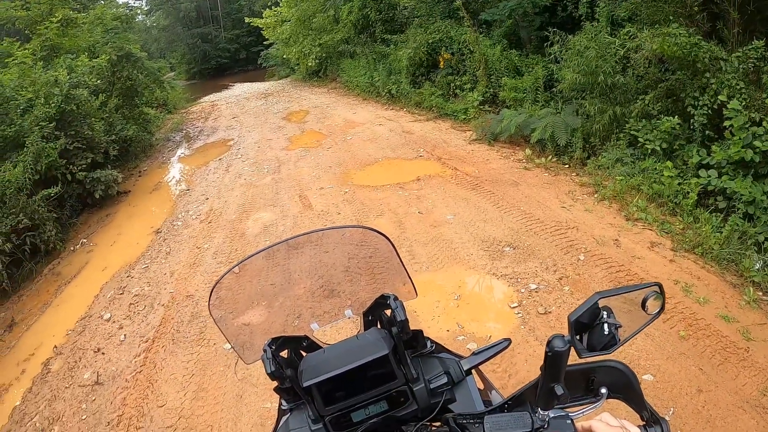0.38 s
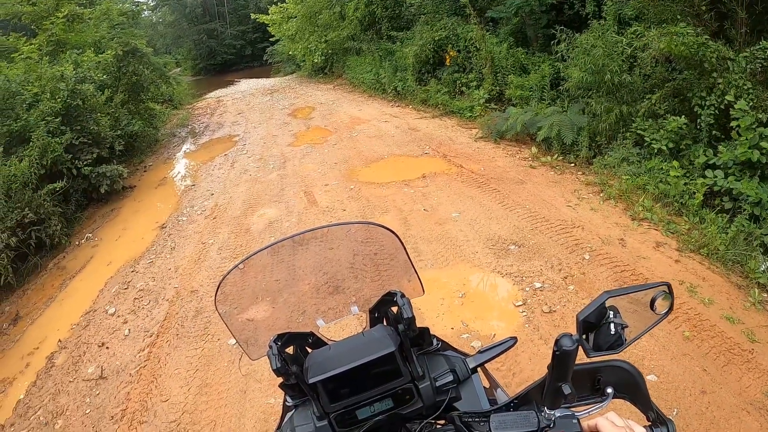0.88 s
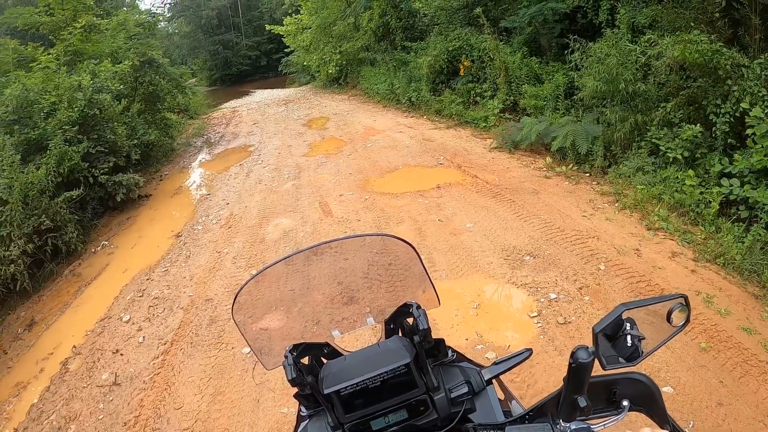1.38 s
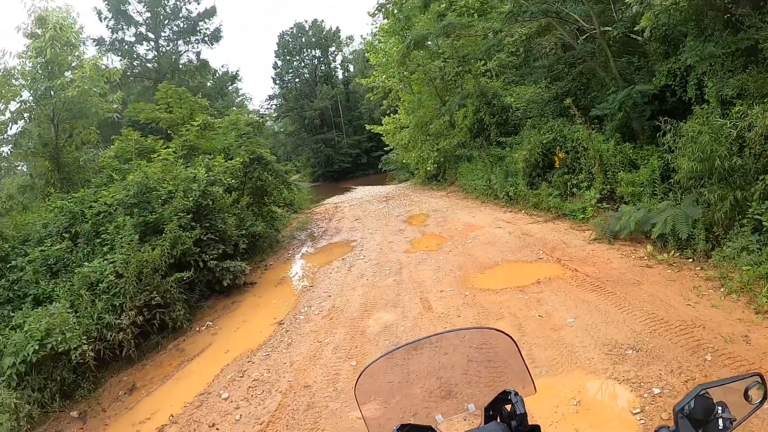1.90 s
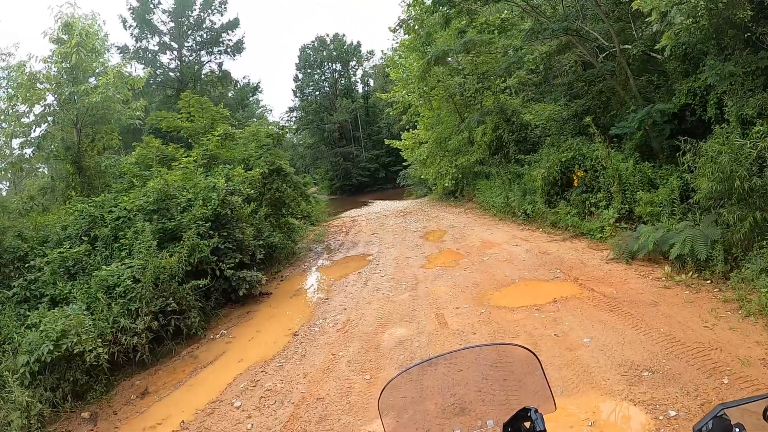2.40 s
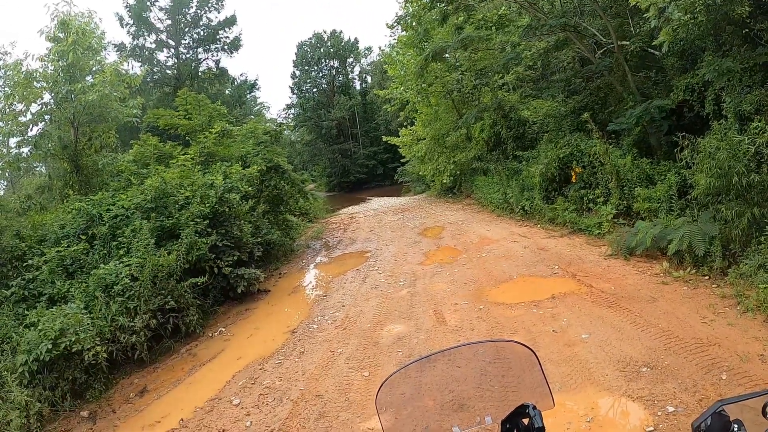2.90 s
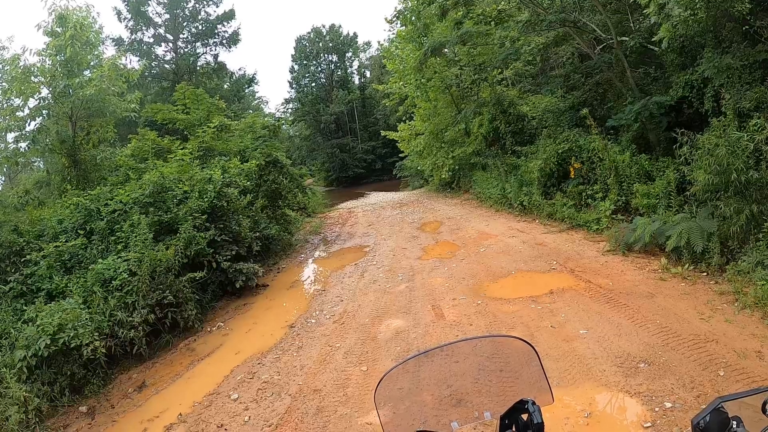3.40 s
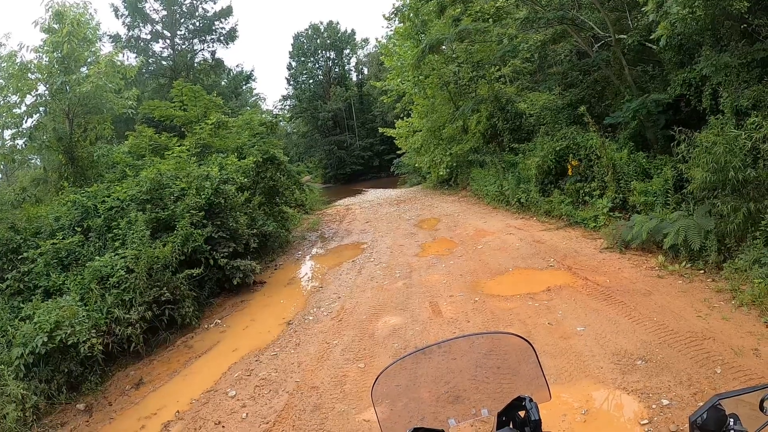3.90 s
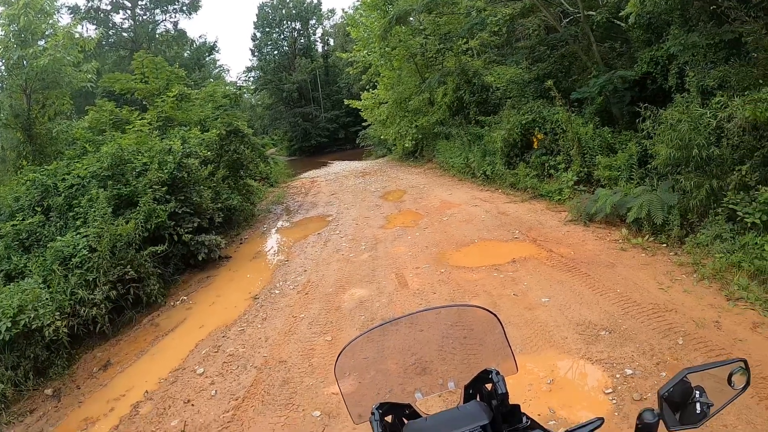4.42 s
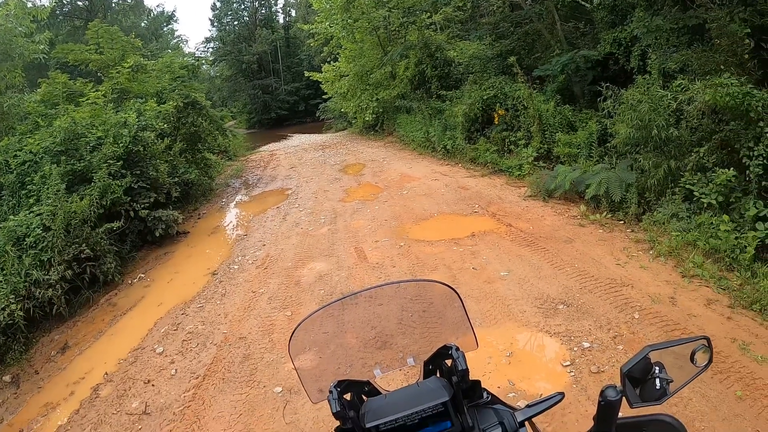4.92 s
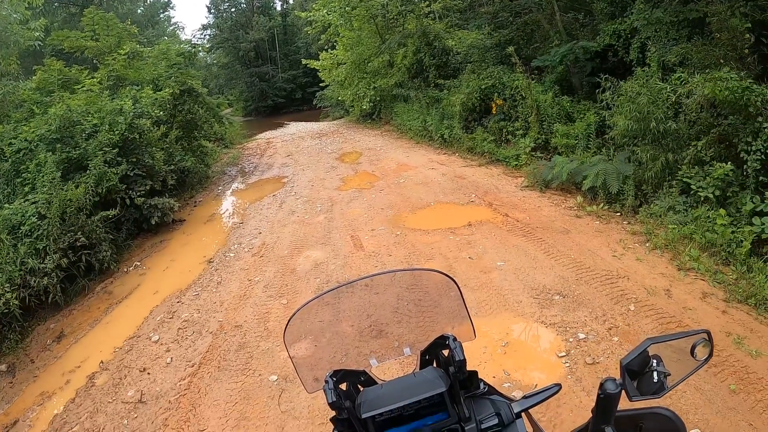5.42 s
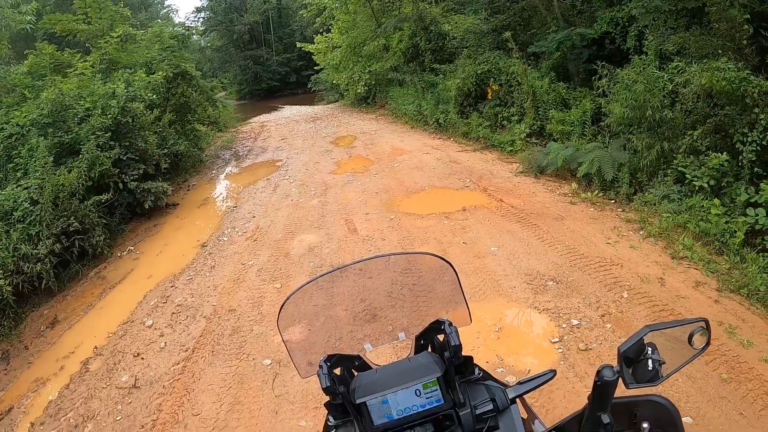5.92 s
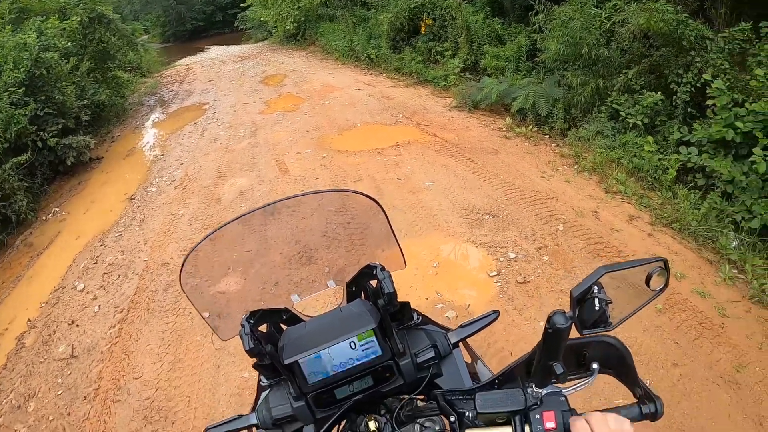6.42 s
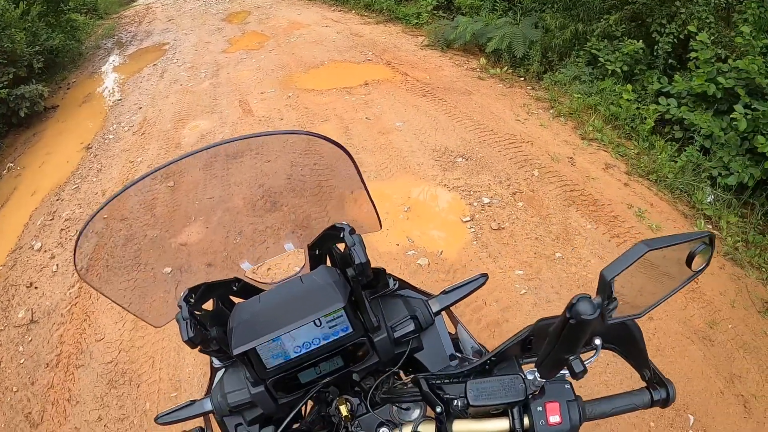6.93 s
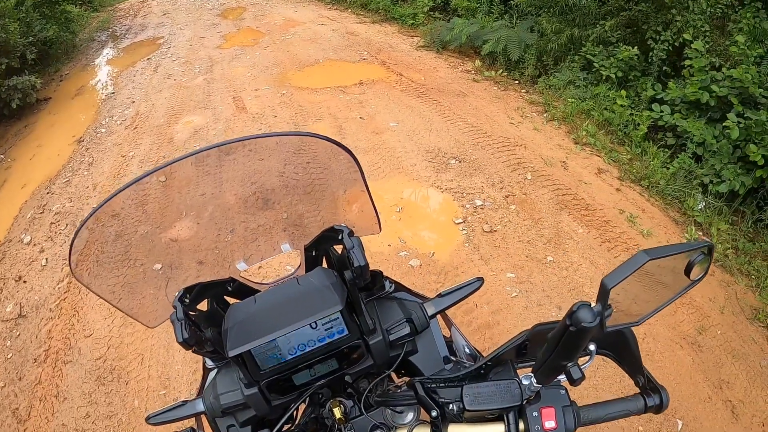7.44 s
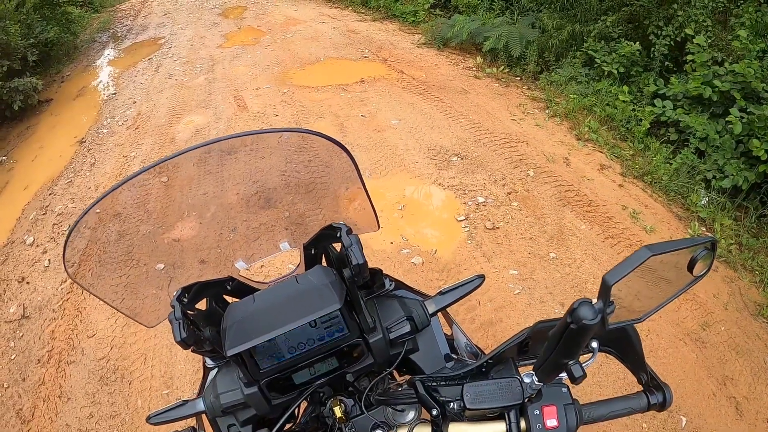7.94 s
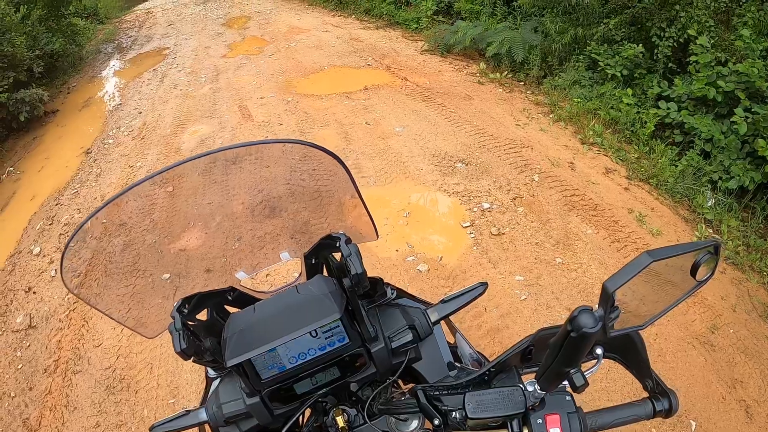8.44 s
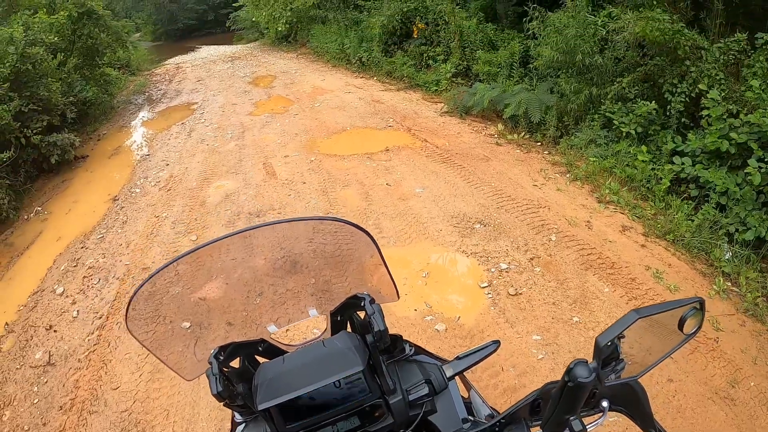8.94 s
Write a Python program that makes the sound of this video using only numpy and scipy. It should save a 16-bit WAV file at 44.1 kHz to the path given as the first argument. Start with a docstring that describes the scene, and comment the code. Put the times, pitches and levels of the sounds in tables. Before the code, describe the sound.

Just-caught motorcycle engine flares briefly and drops to a steady lumpy idle, heard close from the rider's head, with faint bird whistles and small plastic ticks.

```python
"""Hard barks and a bright starter rush: a twin-cylinder motorcycle engine has just caught under a rider's
helmet microphone. It flares, then settles from a fast idle to a slow one, throbbing with uneven firing.
Gas pulses locked to the crank ring pipe and silencer; blows and chatter ring the cases; shaped noise makes
the chain, gear and air rustle. Far birds are gliding sines, close plastic ticks are ringing noise bursts."""
import sys
import numpy as np
from scipy import signal
from scipy.fft import rfft, irfft, next_fast_len
from scipy.io import wavfile
from scipy.ndimage import uniform_filter1d

SR = 44100
rng = np.random.default_rng(int(sys.argv[2]) if len(sys.argv) > 2 else 0)


def dump_mix(stems):
    """Bounce the given channels to the path in sys.argv[1] as a 16-bit WAV at rate SR."""
    frames = np.atleast_2d(stems).T  # one column per channel
    limited = np.clip(frames, -1, 1)  # hard clip at full scale
    pcm = np.round(limited * 32767).astype(np.int16)
    wavfile.write(sys.argv[1], SR, pcm)


def nominal_scale(level):
    """Amplitude ratio for a level in decibels (scalar or array-like)."""
    x = np.asarray(level, float) / 20
    return 10 ** x


N = 399987

# crank speed: time_s, speed_rpm
CRANK_RPM = [(0, 1886.4), (.3, 1525.6), (1, 1636.4), (1.28, 1614.2), (1.56, 1641.6), (1.98, 1573.4),
             (2.54, 1423.4), (3.66, 1461.7), (3.94, 1406.9), (4.36, 1401), (4.5, 1438.5), (4.78, 1378.2),
             (5.48, 1354.9), (5.62, 1404.3), (6.18, 1320.2), (6.32, 1384.2), (7.3, 1312.4), (7.72, 1373.3),
             (8.7, 1336.9), (9.07, 1371.8)]
# throttle over the first uneven firings: time_s, throttle_db
THROTTLE = [(0, 4), (.05, 0), (.1, 6.5), (.15, -4), (.2, -0.5), (.3, 1), (.5, 0.28)]
# head bowed towards the engine: time_s, bow_0_to_1
HEAD_BOW = [(0, .6), (1.5, .6), (2, 0), (4.3, 0), (4.7, .3), (6.3, .4), (6.7, 1), (8.5, 1), (9.07, .6)]
# modes of the cases: mode_hz
CASE_MODES_HZ = [195, 249, 290, 337, 400, 480, 600, 790, 1090, 1220, 1640, 2050, 2300, 3150, 3940, 4250,
                 5060, 6000, 8900]
# per mode: width_hz (one pass), level_db, fast_idle_extra_db, bowed_extra_db
CASE_MODES = [(53.4, -33, 2.5, -4), (49.4, -40, 0, 1.9), (54, -44, -4, -2.5), (52.3, -46.5, -2.5, 1.5),
              (75.4, -45.5, -1.6, 5), (66, -47, 3, 1.7), (80, -54.5, 10, -7), (90, -60, -2.5, 6.5),
              (138.89, -59, -1.5, 13.5), (130, -59, 3.5, 16), (120, -54.5, 10, 0), (102, -55.5, -11, 8),
              (164, -71, 12.5, 1.5), (95, -63, -0.5, -14.5), (83, -68.5, 4.5, -1.5), (61, -65, -2.5, 1.5),
              (86, -72.5, -0.5, -7.5), (240, -73, -2, 3), (500, -77.5, 1.3, -2.5)]


def evened(x):
    """Scales to rms 1."""
    return x / np.sqrt(np.mean(x ** 2) + 1e-20)


def read_log(points, hz):
    """Reads a spectrum on a log frequency axis."""
    f_hz, value = np.transpose(points)
    return np.interp(np.log(hz + 1), np.log(f_hz + 1), value)


def at_times(curve, t_s):
    """Reads a (time, value) curve at times t_s."""
    curve = np.array(curve)
    return np.interp(t_s, curve[:, 0], curve[:, 1])


SIZE = next_fast_len(N + SR // 2)
TIME_S = np.arange(N) / SR
SPEED_RPM = at_times(CRANK_RPM, TIME_S)
START_CYCLE = .098  # share of the four-stroke cycle done at the first instant
CYCLE = START_CYCLE + np.cumsum(SPEED_RPM) / 120 / SR  # one cycle takes two turns
FAST = (SPEED_RPM - 1440) / 180  # 0 at a middling idle, 1 at the fast idle


def since(place, cycle):
    """Share of a cycle since the crank passed a place, and the number of that pass."""
    turns = cycle - place + 20
    return turns % 1, turns.astype(int)


def band(hz, width_hz):
    """Response of one resonance over the FFT bins, gain 1 at its centre."""
    s = 1j * np.fft.rfftfreq(SIZE, 1 / SR)
    return width_hz * s / (hz ** 2 + width_hz * s + s ** 2)


def port(hz):
    """Half the balance and phase step between the two microphone ports."""
    # left-right balance: frequency_hz, balance_db
    tilt = [(60, 1.5), (120, 1.5), (240, 1), (470, -1), (930, -2), (1850, 0.5), (3680, 0.5), (7300, -1),
            (14500, -10.5)]
    # phase by which the left port leads: frequency_hz, lead_rad
    lead = [(30, -.015), (300, -.09), (1000, -0.17), (3010, -0.29), (6120, -1.2), (7240, -3.1),
            (8610, -2.17), (11600, 0.73), (13700, .1)]
    return nominal_scale(read_log(tilt, hz) / 2) * np.exp(.5j * read_log(lead, hz))


def ports(x):
    """Spreads one sound over the two ports with their lag and balance."""
    half = port(np.fft.rfftfreq(SIZE, 1 / SR))
    return irfft(rfft(x, SIZE) * np.array([half, 1 / half]), SIZE)[:, :N]


def noise(field_db):
    """Partly alike two-port noise of rms 1, shaped by a bins x frames field of dB."""
    # left-right likeness: frequency_hz, likeness_0_to_1
    likeness = [(60, 0.96), (130, 0.61), (290, 1), (630, 1), (1380, 0.95), (3020, 0.67), (6620, 0.15),
                (14500, 0.03)]
    lowest_hz = 300
    hz = np.fft.rfftfreq(512, 1 / SR)
    a, b, c, d = rng.standard_normal((field_db.shape[1], 257, 4)).T
    same = np.clip(read_log(likeness, hz), 0, 1)[:, None]
    left = a + 1j * b
    right = same * left + np.sqrt(1 - same ** 2) * (c + 1j * d)
    half = port(hz)[:, None]
    spectra = np.array([left * half, right / half]) * nominal_scale(field_db) * (hz[:, None] > lowest_hz)
    return evened(signal.istft(spectra, nperseg=512, noverlap=384)[1][:, :N])


def exhaust():
    """Gas pulses locked to the crank ring the pipe and the silencer chambers."""
    # firing order: place_cycles, level_db
    cylinders = [(0, 0), (.3636, -2.3)]
    # gas pulses around each firing: place_cycles, length_cycles, signed_area
    strokes = [(-.0184, .0109, .109), (.2702, .0671, -.587), (.3872, .0545, -.223)]
    # silencer chambers: centre_hz, width_hz, signed_gain
    silencer = [(58.8, 21.2, .202), (80.5, 10.9, -.217), (91.3, 16.7, -.125), (177, 16.8, .089)]
    pipe_hz, pipe_width_hz = 36.9, 13
    scatter_db = 0.45
    throttle_bites = (1.6, .5, .5)  # dB per throttle dB; the sharp blowdown gains most
    # the pipe already rings: past firings wrap round the FFT
    earlier_s = -np.arange(SIZE - N, 0, -1) / SR
    cycle = np.r_[CYCLE, START_CYCLE + earlier_s * CRANK_RPM[0][1] / 120]
    throttle_db = at_times(THROTTLE, np.r_[TIME_S, earlier_s])
    gas = np.zeros(SIZE)
    for fire, db in cylinders:
        strength = nominal_scale(db + scatter_db * rng.standard_normal(200))
        for (place, length, area), bite in zip(strokes, throttle_bites):
            u, k = since(fire + place, cycle)
            pulse = u / length ** 2 * np.exp(-u / length)
            gas += area * strength[k] * nominal_scale(bite * throttle_db) * pulse
    gas[:N] *= nominal_scale(0.2 * FAST)  # more gas at speed
    s = 1j * np.fft.rfftfreq(SIZE, 1 / SR)
    chambers = sum(gain * band(hz, width_hz) for hz, width_hz, gain in silencer)
    pipe = band(pipe_hz, pipe_width_hz) * s / pipe_width_hz  # rolls off under its lowest note
    return irfft(rfft(gas) * chambers * pipe, SIZE)[:N]


def cases():
    """Combustion and valve blows ring the modes near the part they strike; also returns the blow beat."""
    # blows in each cycle: place_cycles, level_db, part_hz, reach_octaves
    blows = [(.03, 0, 195, 0.24), (.14, -4.5, 1500, .7), (0.211, 3, 485, .25), (.24, 2, 793, 0.25),
             (.24, -4.5, 2330, 0.58), (0.286, 2.5, 1564, .35), (0.301, 3, 246.5, 0.32), (.3, -6, 4980, 1.2),
             (.35, -0.5, 1160, 0.45), (.38, -1.5, 393, 0.3), (.5, -6, 1150, 0.34), (.53, 1.5, 214, 0.31),
             (.6, 0, 2080, 0.36), (.64, 2, 287, 0.16), (.73, -5, 412, .3), (.81, -1, 1300, 0.45),
             (.93, -4.5, 4500, .8)]
    places, levels_db, parts_hz, reaches_oct = np.transpose(blows)
    scatter_db = .8 * rng.standard_normal((len(blows), 200))
    knocks, chatters = np.zeros((2, len(blows), N))
    for i, place in enumerate(places):
        u, k = since(place, CYCLE)
        size = nominal_scale(levels_db[i] + scatter_db[i])[k]
        knocks[i] = size * np.exp(-u / 0.0011)  # decays in shares of a cycle
        chatters[i] = size * np.exp(-u / 0.034)
    bow = at_times(HEAD_BOW, TIME_S)
    fast = np.clip(FAST, -.2, 1)
    out = np.zeros(N)
    for hz, (width_hz, db, fast_db, bow_db) in zip(CASE_MODES_HZ, CASE_MODES):
        near = np.exp(-(np.log2(hz / parts_hz) / reaches_oct) ** 2)
        clean = .95 / (1 + (hz / 3000) ** 1.2)  # power share rung by the bare blow; the rest is chatter
        chatter = (near @ chatters + 0.4) * rng.standard_normal(N)
        drives = np.array([near @ knocks, chatter])
        struck, rubbed = irfft(rfft(drives, SIZE) * band(hz, width_hz) ** 2, SIZE)[:, :N]
        ring = np.sqrt(clean) * evened(struck) + np.sqrt(1 - clean) * evened(rubbed)
        out += nominal_scale(db + fast_db * fast + bow_db * bow) * ring
    surge = nominal_scale(1.2 * at_times(THROTTLE, TIME_S))  # harder blows while the throttle flares
    beat = uniform_filter1d(chatters[parts_hz > 500].sum(0), size=200)
    return out * surge, beat


def rustle(beat):
    """Chain, gear and air noise that swells with the blows and changes colour as the head bows."""
    # spectrum with the head up: frequency_hz, density_db_per_hz
    ahead = [(260, -9), (450, -1), (833, -18.5), (1080, -6.5), (1430, -14.5), (2040, -12), (2190, -15.5),
             (3400, -22.5), (4110, -24), (4830, -32), (6390, -34), (12000, -57), (14900, -77.5)]
    # spectrum with the head bowed: frequency_hz, density_db_per_hz
    bowed = [(260, -13), (450, -1.5), (603, -9.5), (688, -14), (1220, -12), (1760, -12), (2040, -14),
             (2650, -17), (6020, -31), (7730, -41.5), (9490, -41.5), (12900, -60), (14900, -64)]
    # drive ahead of the beat factor; the extras are for bowed head, fast idle and the catch
    drive_db, bow_extra_db, fast_extra_db = -32.5, 2.5, 0.97
    catch_extra_db, catch_fade_s = 5.5, 0.17
    frame_s = np.arange(N // 128 + 5) * 128 / SR
    hz = np.fft.rfftfreq(512, 1 / SR)[:, None]
    bow = at_times(HEAD_BOW, frame_s)
    patches = rng.standard_normal((len(frame_s), 257))
    patches = uniform_filter1d(uniform_filter1d(patches, 8, 0), 5, 1)  # over frames, then bins
    patches_db = 1.2 * evened(patches).T
    field_db = (1 - bow) * read_log(ahead, hz) + bow * read_log(bowed, hz) + patches_db
    mid_power = np.sum(nominal_scale(2 * field_db[8:70]), axis=0)  # about 0.7 to 6 kHz, evened frame by frame
    steady = noise(field_db - 10 * np.log10(mid_power))
    level_db = drive_db + bow_extra_db * at_times(HEAD_BOW, TIME_S)
    level_db = level_db + fast_extra_db * np.clip(FAST, 0, 1)
    level_db = level_db + catch_extra_db * np.exp(-TIME_S / catch_fade_s)
    return nominal_scale(level_db) * steady * (0.49 + 0.086 * evened(beat))


def starter():
    """The starter gear lets go: a bright noise rush, held briefly, then decaying exponentially."""
    # rush spectrum: frequency_hz, density_db_per_hz
    rush_spectrum = [(320, -36), (550, -5.5), (640, -10), (856, -32), (917, -7.5), (1410, -11.5),
                     (1640, -5), (1830, -28.5), (2580, -13), (2770, -17.5), (4430, -22.5), (14900, -48)]
    level_db, hold_s, t60_s = -29, .03, 0.44
    hz = np.fft.rfftfreq(512, 1 / SR)[:, None]
    rush = noise(read_log(rush_spectrum, hz) + np.zeros(N // 128 + 5))
    return nominal_scale(level_db - 60 * np.maximum(TIME_S - hold_s, 0) / t60_s) * rush


def kicks():
    """The first hard firings bark through the seven lowest modes of the cases, at doubled width."""
    # hard firings: time_s, peak_db (ahead of the ports)
    hard_firings = [(0.022, -6.5), (.074, -16), (0.094, -25), (.138, -23)]
    response = sum(band(hz, 2.0 * row[0]) ** 2 * nominal_scale(row[1])
                   for hz, row in zip(CASE_MODES_HZ[:7], CASE_MODES))
    bark = irfft(response, SIZE)[:SR // 4]
    out = np.zeros(N)
    for start_s, peak_db in hard_firings:
        out[round(start_s * SR):][:len(bark)] += nominal_scale(peak_db) * bark / abs(bark).max()
    return out


def birds():
    """Thin gliding sine whistles with soft ends."""
    # whistles: start_s, length_s, from_hz, to_hz, peak_db (ahead of the ports)
    whistles = [(.625, .04, 3200, 3120, -40), (5.805, .05, 4735, 4730, -52), (5.86, .055, 4730, 4725, -52),
                (6.02, .07, 3980, 3950, -53), (6.08, .21, 4545, 4530, -54), (6.27, .07, 4000, 3970, -54),
                (6.39, .04, 4010, 4000, -53), (6.47, .035, 5300, 4300, -58), (6.76, .04, 5200, 4300, -58)]
    out = np.zeros(N)
    for start_s, length_s, from_hz, to_hz, db in whistles:
        u = np.clip((TIME_S - start_s) / length_s, 0, 1)
        pitch_hz = from_hz + (to_hz - from_hz) * u
        tone = np.sin(2 * np.pi * np.cumsum(pitch_hz) / SR)
        out += nominal_scale(db) * np.sqrt(np.sin(np.pi * u) + 1e-12) * (u < 1) * tone
    return out


def ticks():
    """Small plastic ticks close by: two ms of crackle through a few short modes."""
    # ticks: start_s, peak_db (mean of both sides), left_right_db
    tick_times = [(1.309, -35, -5), (7.5014, -46, -4), (8.258, -19, -5), (8.9516, -25, -3)]
    # modes: centre_hz, width_hz (one pass), gain_db
    tick_modes = [(1500, 1000, 11), (3550, 700, 19.5), (6260, 1000, 2), (9250, 2500, -9.5)]
    ring = sum(nominal_scale(db) * band(hz, width_hz) ** 2 for hz, width_hz, db in tick_modes)
    out = np.zeros((2, N))
    for start_s, db, pan_db in tick_times:
        fade = np.exp(-(np.maximum(TIME_S - start_s, 0) / 0.0011) ** 2)
        burst = rng.standard_normal(N) * (TIME_S > start_s) * fade
        tick = irfft(rfft(burst, SIZE) * ring, SIZE)[:N]
        out += nominal_scale([[db + pan_db / 2], [db - pan_db / 2]]) * tick / abs(tick).max()
    return out


def scene():
    """Engine and birds through the ports, with rustle, starter and ticks added in stereo."""
    ring, beat = cases()
    through_ports = ports(exhaust() + kicks() + ring + birds())
    return through_ports + rustle(beat) + starter() + ticks()


def roll_off(x):
    """The treble ends steeply here."""
    return signal.sosfilt(signal.butter(12, 15090, fs=SR, output="sos"), x)


def record(dry):
    """Delivers the finished mix."""
    return roll_off(dry)


dry = scene()
out = record(dry)
dump_mix(out)
```